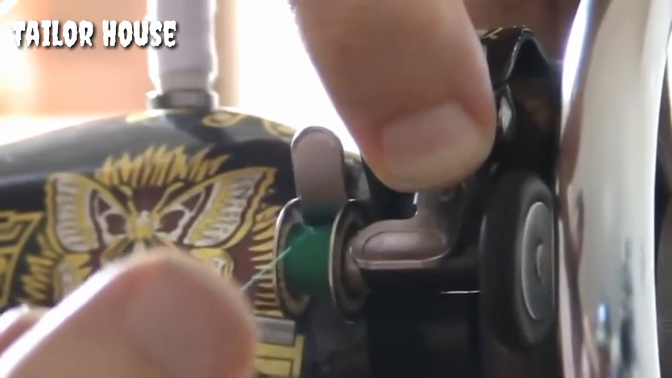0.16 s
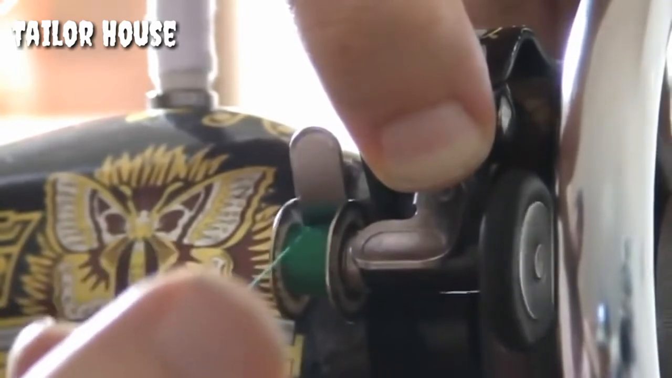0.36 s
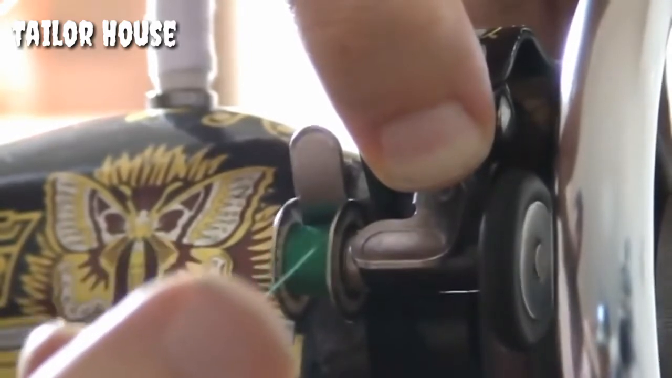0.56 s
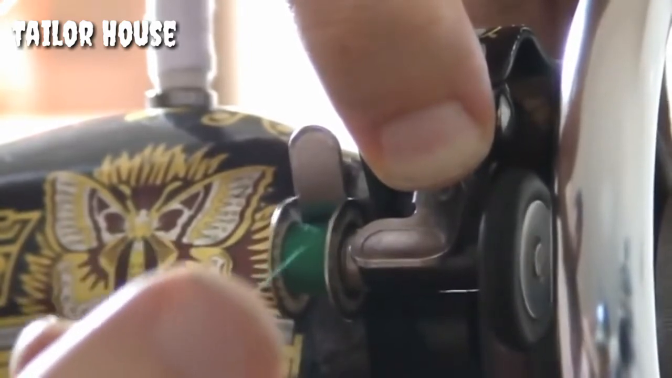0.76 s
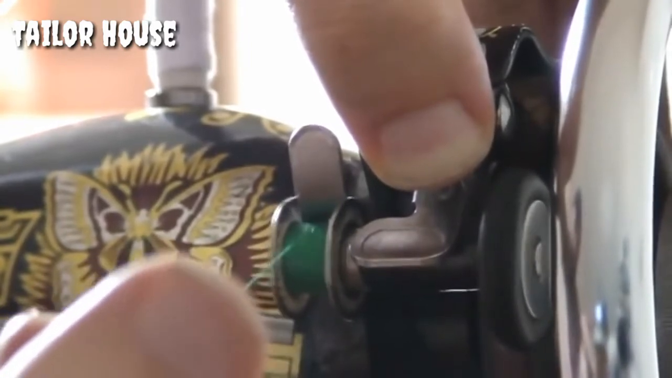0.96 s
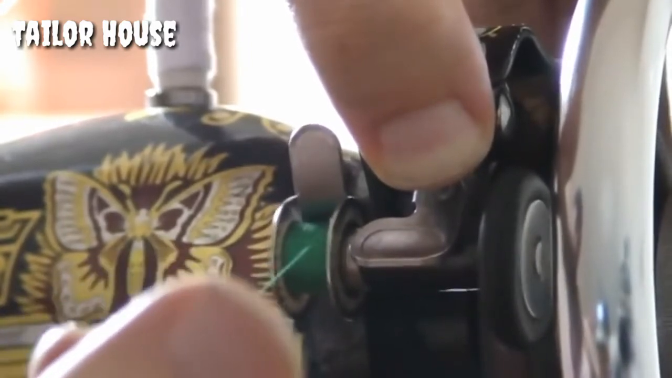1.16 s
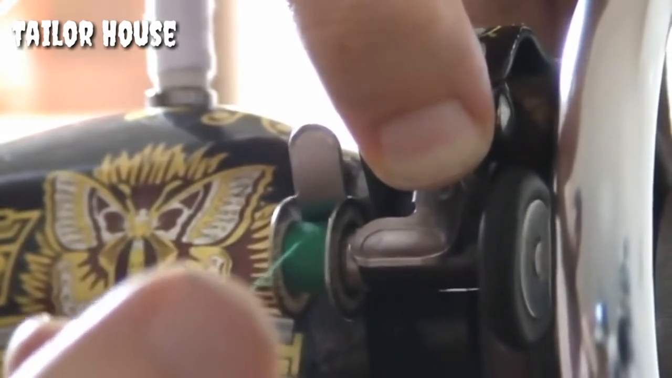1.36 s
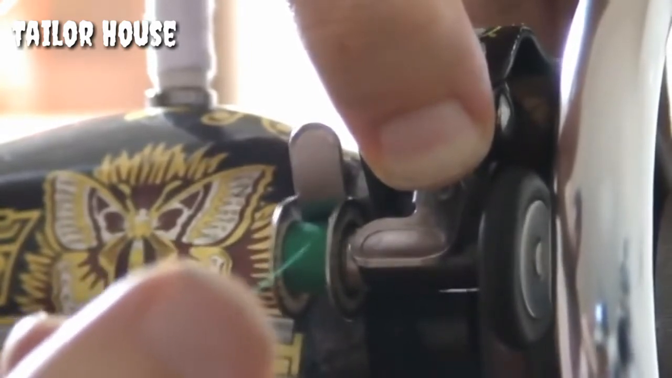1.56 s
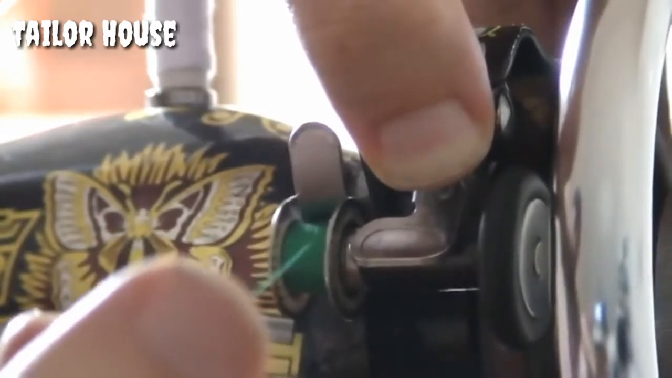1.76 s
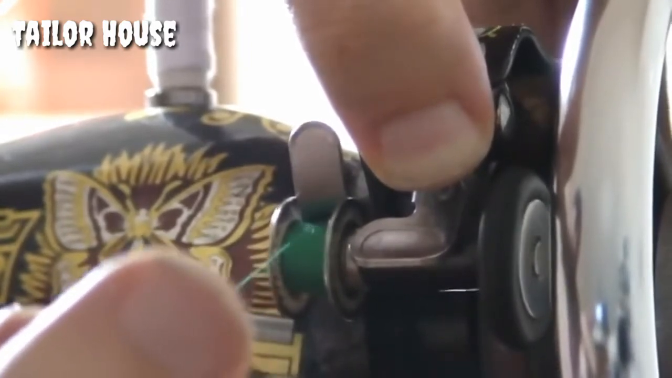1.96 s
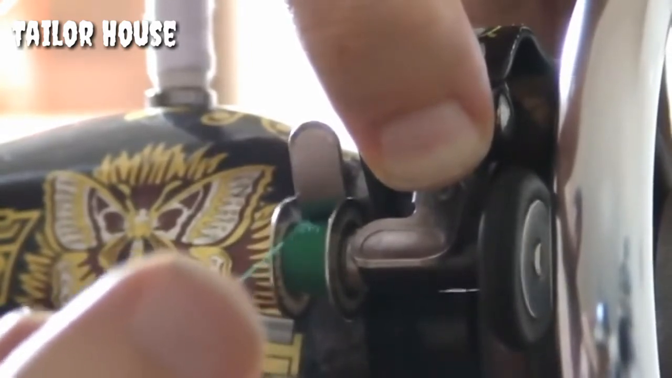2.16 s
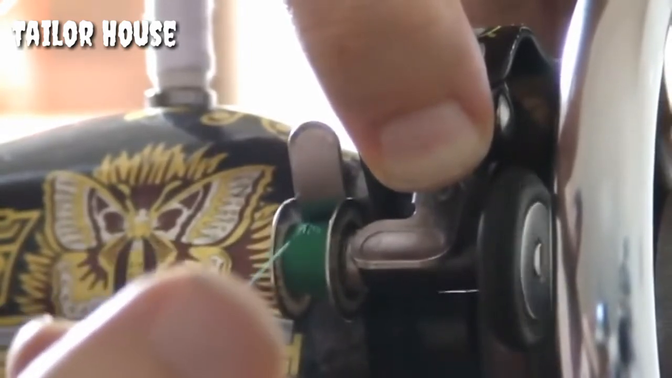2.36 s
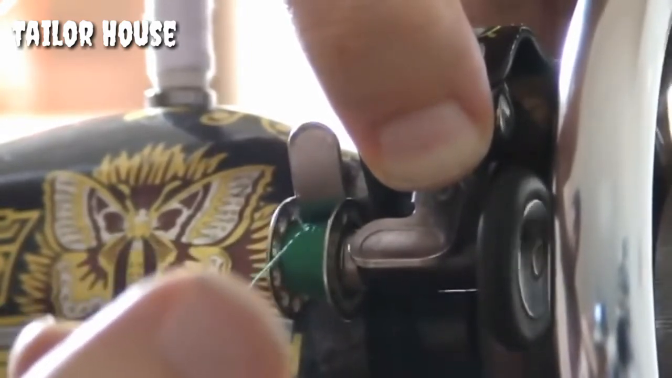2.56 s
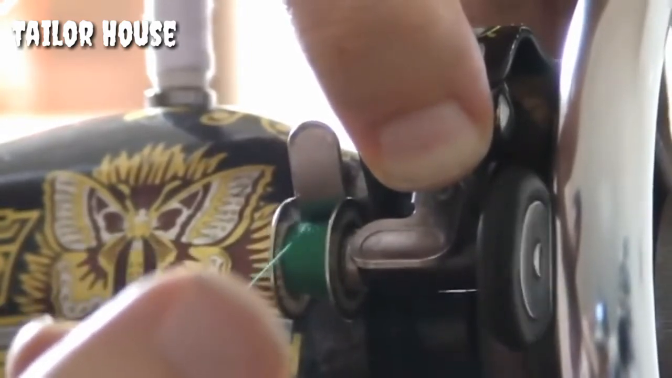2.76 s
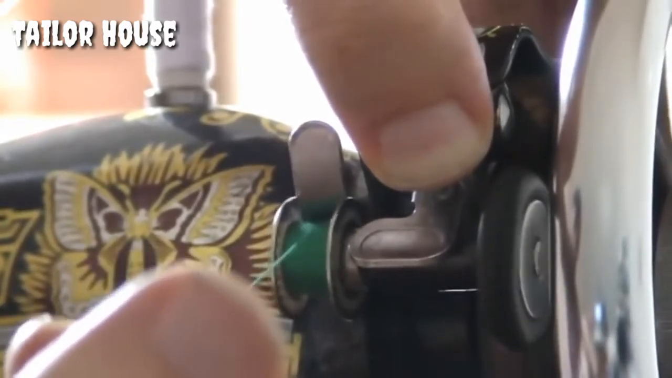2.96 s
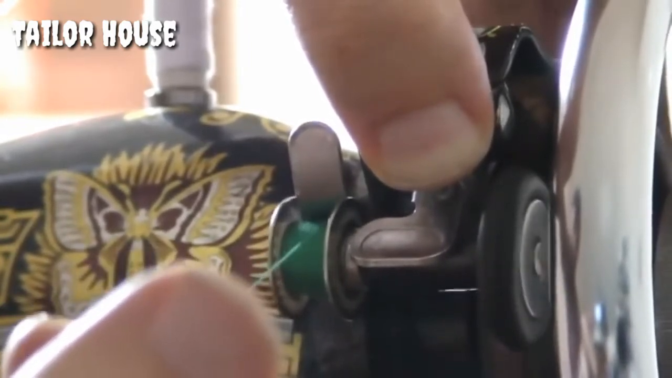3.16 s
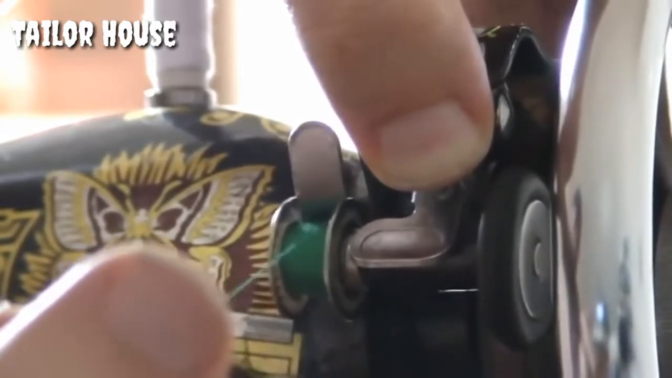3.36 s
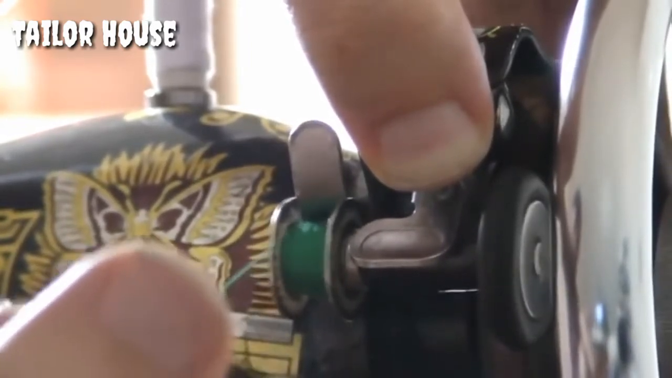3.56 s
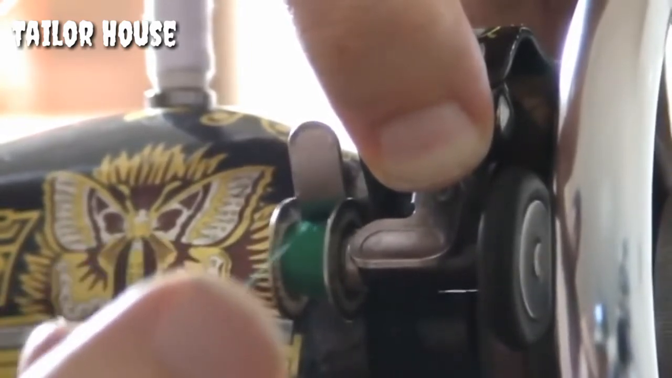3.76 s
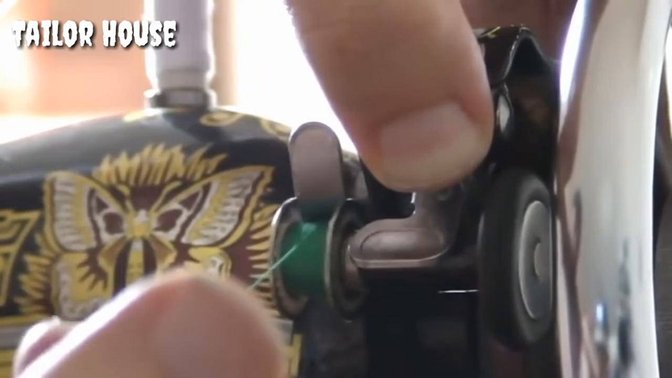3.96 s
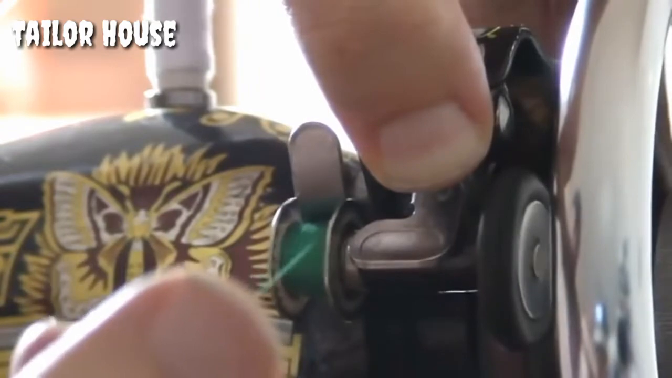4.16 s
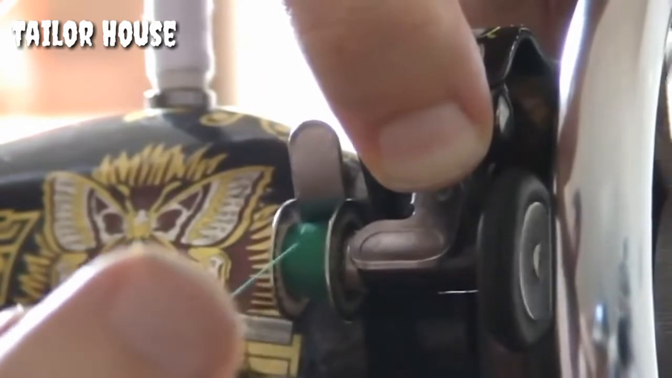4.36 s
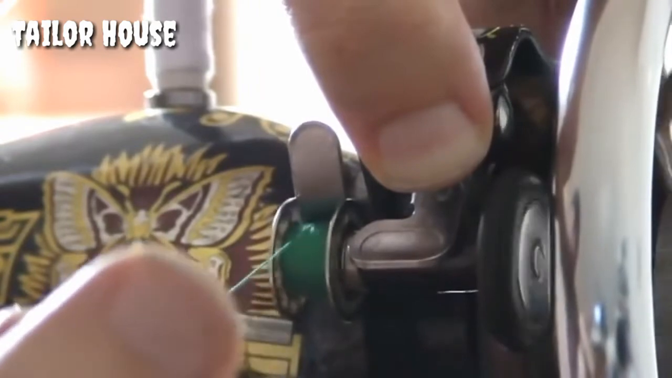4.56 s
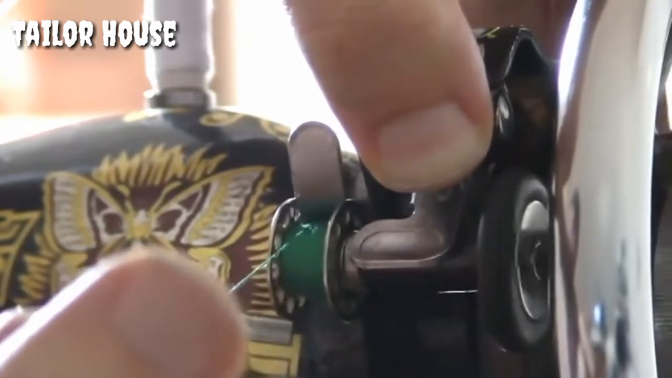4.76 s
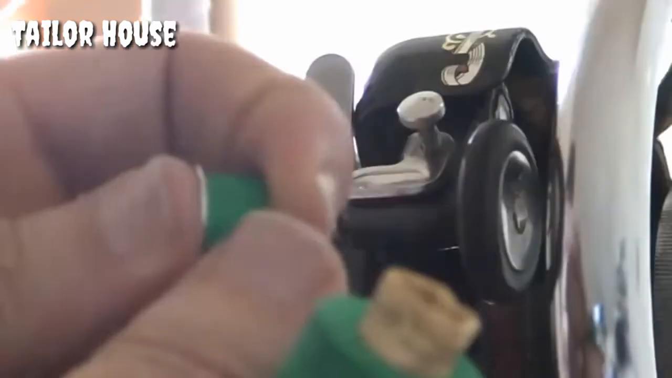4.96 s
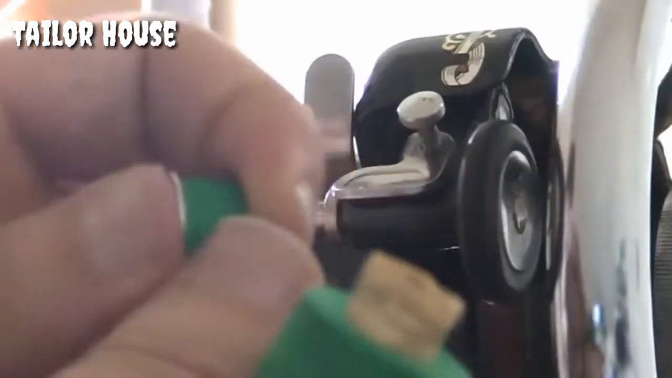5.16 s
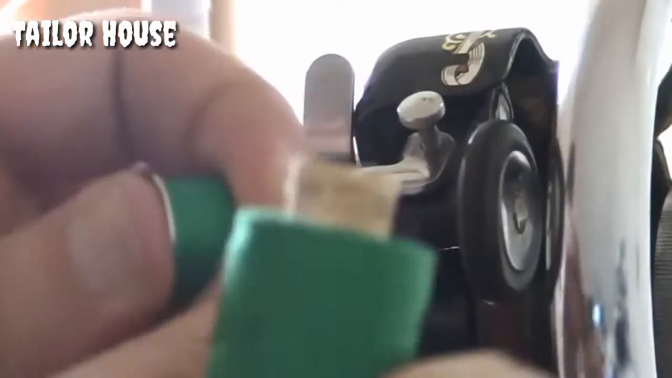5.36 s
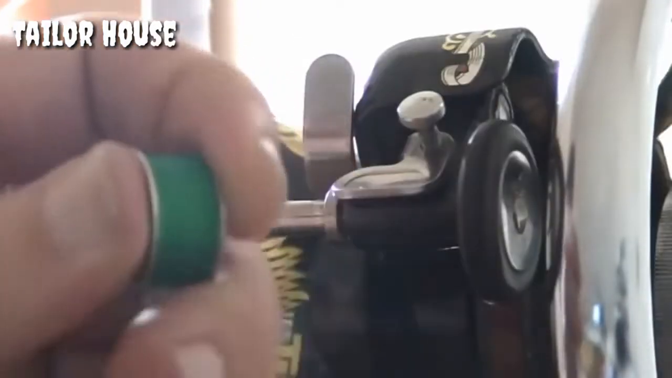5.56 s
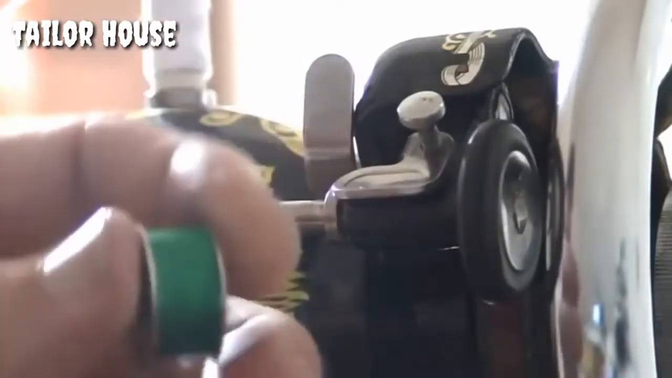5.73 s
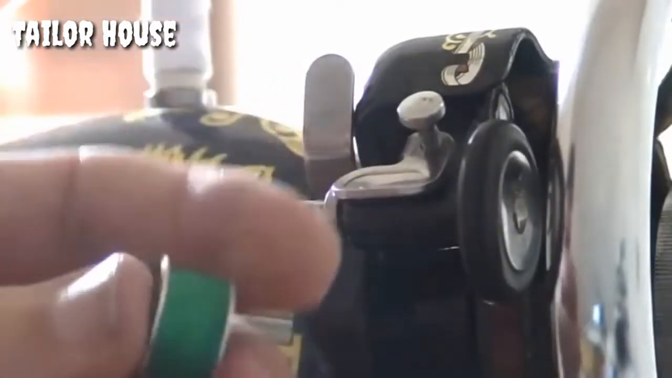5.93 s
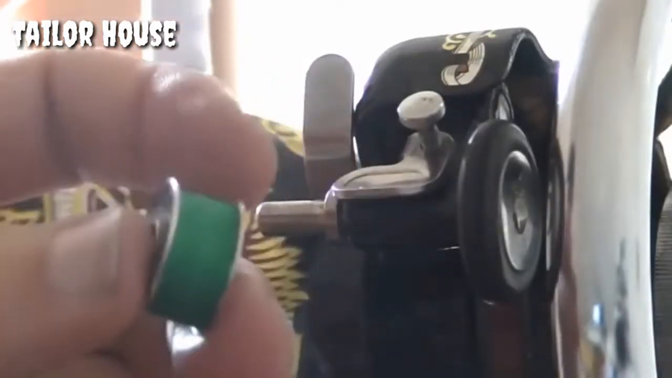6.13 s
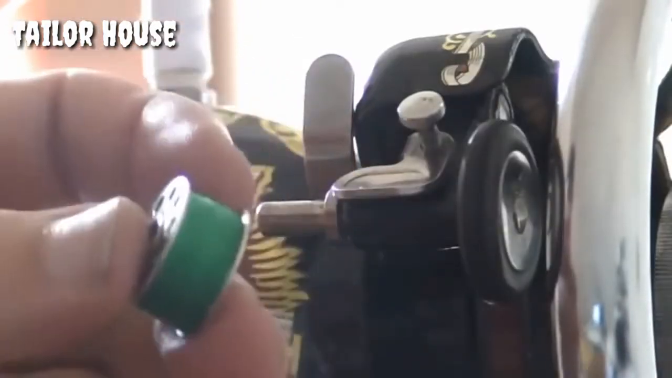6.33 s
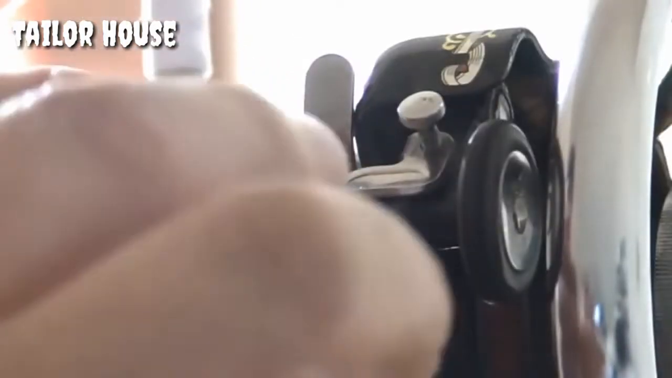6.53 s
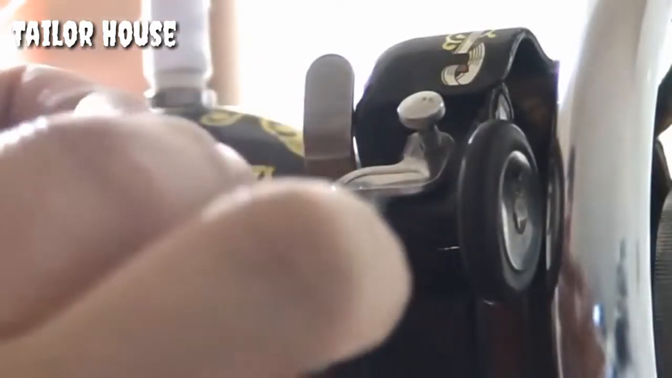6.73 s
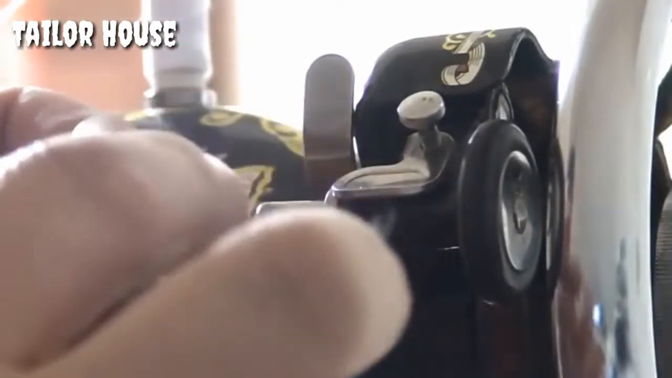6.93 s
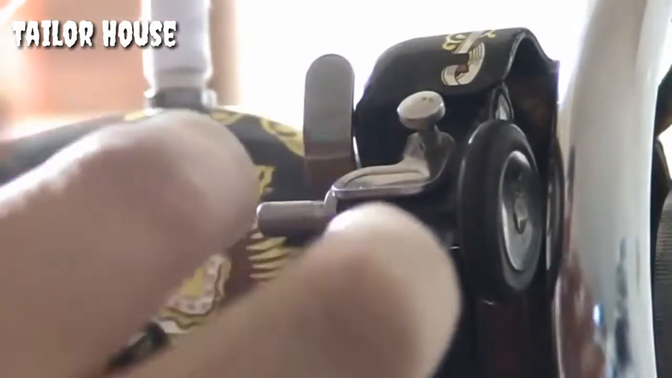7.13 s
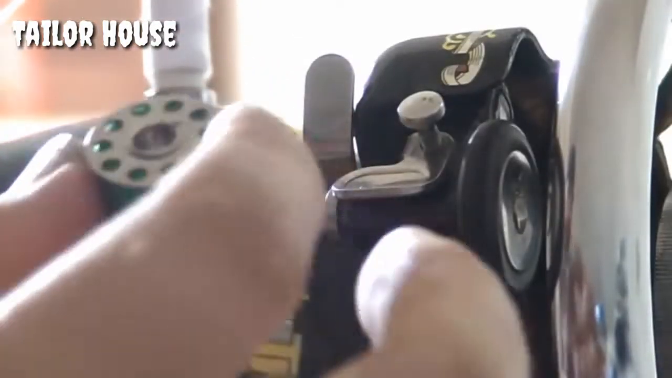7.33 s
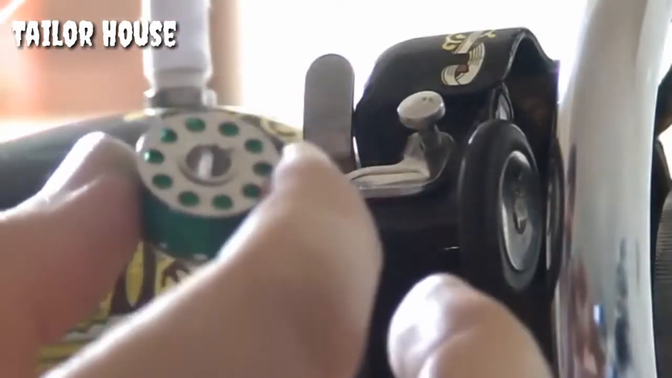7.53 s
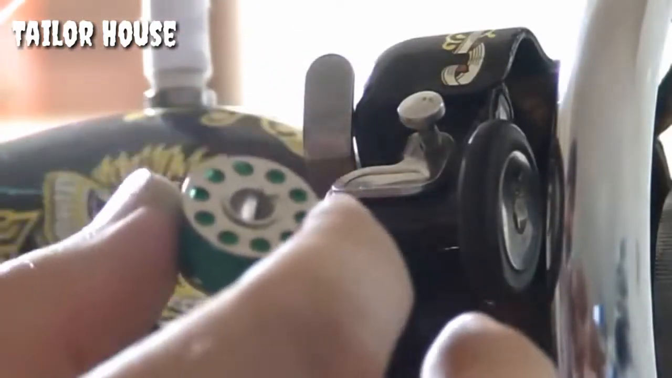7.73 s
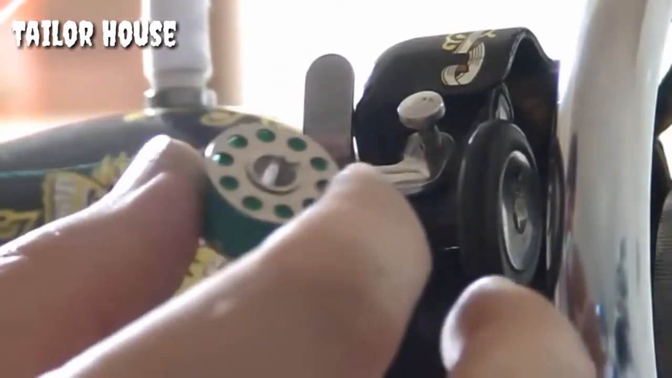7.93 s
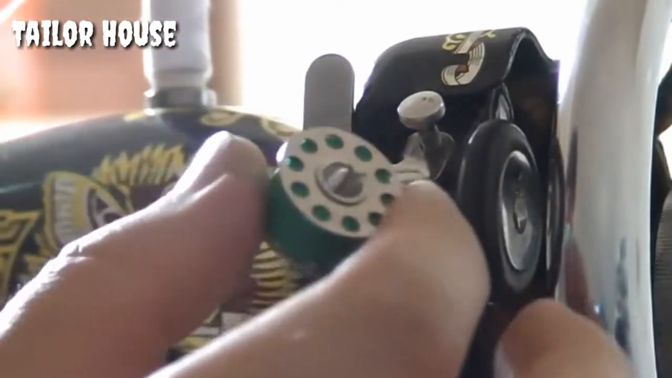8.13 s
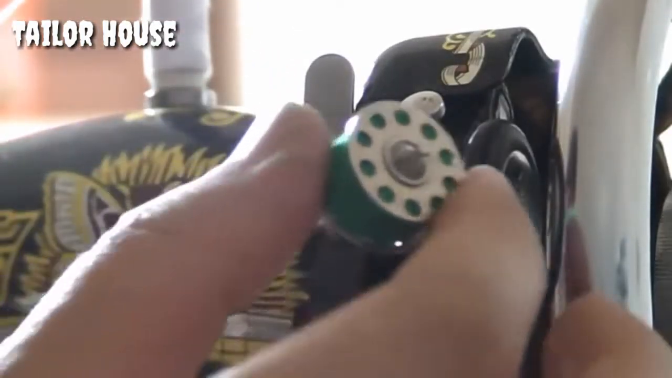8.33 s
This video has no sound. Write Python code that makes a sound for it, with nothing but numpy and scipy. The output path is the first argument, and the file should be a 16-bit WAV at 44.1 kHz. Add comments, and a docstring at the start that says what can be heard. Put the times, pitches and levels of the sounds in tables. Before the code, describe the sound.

Close up, a sewing machine's bobbin winder is already running, a dry bright metallic rattle over motor hum and a spindle whine. It slackens until about 0.5 s, then a knock and short scrape mark the drive gripping again; the rattle thickens and the whine climbs, fastest near 1.7 s. It coasts down into separate knocks and nearly stops around 2.6 s. Another scrape at 2.7 s, and it speeds up to a peak near 3.75 s, then slows and dies by 4.75 s. A ringing latch click comes at 4.9 s, another at 4.95 s, cut by a tiny dip. A quiet room follows: hiss, wavering low hum, faint purr. A sharp thread snap cracks at 5.3 s, with weaker ticks at 5.1 and 5.5 s. Dull thuds land around 6.1 to 6.3 s. Soft finger rustle passes between 7.2 and 7.9 s, then quiet to the end.

```python
"""Bobbin winder on a sewing machine

A motor spins a bobbin winder in spells, close to two microphones. Filtered noise makes the rattle and knocks,
and sines locked to the turning spindle make the whine; both are coloured by resonances of the cast body.
The winder coasts to a stop, a latch clicks with ringing sines, and the level dips for a moment. Then short
noise bursts make thread snaps and dull thuds, and slower noise a finger rustle, in a room with hiss,
a wavering 100 Hz hum, thin high tones and a faint purr."""
import sys
import numpy as np
from scipy import signal
from scipy.fft import irfft
from scipy.io import wavfile
from scipy.ndimage import uniform_filter1d

SR = 44100
rng = np.random.default_rng(int(sys.argv[2]) if len(sys.argv) > 2 else 0)


def store_wav(level_fs):
    """Save 16-bit WAV to argv[1]."""
    pcm = np.round(np.clip(np.atleast_2d(level_fs), -1, 1) * 32767)
    wavfile.write(sys.argv[1], SR, pcm.T.astype(np.int16))


N = 369991
T = np.arange(N) / SR
HZ = np.fft.rfftfreq(16384, 1 / SR)

# Levels in the tables are relative unless called rms or peak.
# Loudness of the rattle as the winder runs: (time [s], level [dB])
RUN = [(0.0, -18), (0.43, -23), (0.61, -21.5), (0.93, -16.5), (1.62, -17), (1.91, -18.5), (2.2, -20.5),
       (2.4, -24.5), (2.49, -27), (2.55, -41.5), (2.64, -44), (2.69, -30), (2.82, -26), (2.91, -22.5),
       (3.11, -18.5), (3.3, -17), (3.8, -18), (4.16, -21.5), (4.43, -25), (4.52, -29.5), (4.6, -30.5),
       (4.69, -50.5), (4.84, -74)]
# Speed of the spindle as the motor pulls and the winder coasts: (time [s], speed [turns/s])
SPIN = [(0.0, 20.7), (0.5, 13.2), (0.9, 25.0), (1.14, 30.3), (1.22, 31.3), (1.36, 31.8), (1.45, 32.7),
        (1.56, 31.8), (1.7, 34.9), (1.82, 31.8), (1.9, 28.9), (2.2, 20.2), (2.56, 8.2), (2.7, 9.3),
        (3.1, 21.3), (3.51, 31.1), (3.75, 35.6), (3.83, 34.2), (4.01, 26.7), (4.4, 19.1), (4.84, 5.1)]
# Clearest knocks of loose parts: (time [s], level [dB])
KNOCKS = [(0.173, 0), (0.2344, -7), (0.2932, -6.5), (0.397, -8), (0.4673, -4.5), (0.5013, -12),
          (0.566, 1.5), (0.633, -5), (0.7019, -3), (0.793, -6), (0.8445, -4), (0.9763, -2), (1.0355, -2),
          (1.8911, -4), (1.954, -6), (2.1306, -4), (2.2513, 0), (2.3193, -6), (2.4099, -13), (2.4319, -9),
          (2.4603, -7.5), (2.474, -10), (2.5636, -9), (2.5919, -11.5), (2.6454, -11), (2.6636, -3),
          (2.7248, -8), (2.7467, -16), (2.7634, -6.5), (2.826, -7.5), (2.9148, -3.5), (2.946, -3),
          (2.983, -5), (3.017, -3.5), (3.043, -1.5), (3.0954, -3), (3.9548, 0.5), (4.459, -9),
          (4.472, -12.5), (4.5185, -9.5), (4.5411, -9), (4.554, -9.5), (4.571, -10), (4.587, -17),
          (4.639, -17), (4.7007, -18.5)]
# The bobbin rubs harder or lifts off, so the rattle surges or lulls: (centre [s], change [dB])
SURGES = [(0.09, 3), (0.175, -1), (0.38, -2), (0.401, 3.5), (0.455, -5), (0.705, 1), (0.744, 2.5),
          (0.806, 3.5), (0.849, 2), (0.922, -0.5), (0.981, 0.5), (1.174, 1.5), (1.401, 0.5), (1.482, 1.5),
          (1.598, 2), (1.709, 2.5), (1.759, 1), (1.932, 1.5), (1.976, 2), (2.016, 4.5), (2.136, 2),
          (2.199, 2), (2.253, 1), (2.309, -2), (2.368, 6), (2.4, -6.5), (2.749, 7.5), (2.812, -6),
          (2.84, 3.5), (2.879, 4), (2.949, 0.5), (3.049, -2), (3.105, 0.5), (3.289, 2), (3.435, 2),
          (3.532, 0), (3.742, 1.5), (3.828, 2), (3.88, 3), (3.957, -2), (4.027, 4), (4.065, 5.5),
          (4.108, 7), (4.154, 4), (4.2, 4), (4.251, 5), (4.314, 4), (4.384, 8), (4.465, 3), (4.505, -4.5),
          (4.574, 5)]
# Colour of the rattle: (frequency [Hz], level per Hz [dB])
RATTLE = [(1180, -43), (2000, -5), (2320, -5.5), (3680, -4.5), (4190, -4), (6640, -3.5), (8050, -7),
          (10800, -5.5), (14900, -16.5), (16000, -14)]
# Resonances of the cast body, spindle and bobbin: (frequency [Hz], width [Hz], height above the spectrum [dB])
BODY = [(107, 12, 9.5), (178, 10, 2.5), (291.3, 9.6, 5.5), (313, 9, 4.5), (677, 20, 11), (784, 35, 8.5),
        (808.6, 22, 12), (993, 37, 12), (1450, 38, 8), (1561, 41, 12.5), (1371, 30, 4), (1717, 50, 10.5),
        (1804, 40, 10), (2320, 52, 9.5), (2787, 116, 5.5), (3256, 37, 5.5), (4300, 130, 4.5),
        (5730, 89, 3.5), (6770, 120, 4.5), (8600, 250, 3.), (10600, 85, 11.5), (11340, 140, 5),
        (11430, 140, 6), (13000, 230, 3.5)]
# Resonances of the steel bobbin: (frequency [Hz], width [Hz], level [dB])
BOBBIN = [(10960, 280, 6), (11600, 500, -7), (12700, 900, -11)]
# Balance of the machine in the two microphones: (frequency [Hz], left minus right [dB])
NEAR_LR = [(60, -7.5), (210, -14.), (330, -10.), (500, -4.), (800, -8.), (1800, -8.), (2800, -4.),
           (6400, -1.5), (8500, 0.), (10500, 1.1), (11600, 0.1), (12000, -17.), (15000, -24.)]
# Likeness of the machine in the two microphones: (frequency [Hz], likeness [0-1])
NEAR_SAME = [(60, 0.1), (300, 0.25), (1400, 0.55), (3000, 0.061), (5000, 0.15), (7000, 0.11), (10500, 0.37),
             (15000, 0.29)]
# Strength of each whine tone at 30 turns a second, ahead of the body: (level [dB])
WHINE_DB = [-52, -50, -45, -41, -38, -47, -52, -47, -54, -49]
WHINE_ORDERS = np.arange(6, 16)  # multiples of the spindle speed
# Whole multiples of the spindle speed that kick the arm: (multiple [1], level [dB])
ARM_KICKS = [(8, -28.), (9, -21.), (10, -22.), (11, -33.), (14, -18.)]
# Spells in which the motor takes current: (start [s], end [s], 50 Hz hum at its top [dB])
PULLS = [(-.3, .12, -47), (.5, 1.7, -46), (2.674, 3.78, -43)]
# Room hum near 100 Hz: (time [s], level [dB])
HUM = [(4.98, -64), (5.25, -52), (6.19, -43.5), (6.26, -29.5), (6.35, -66), (6.39, -46), (7.53, -45.5),
       (7.55, -51.5), (8.13, -50), (8.26, -40), (8.34, -61), (8.39, -45)]
# Colour of the room hiss: (frequency [Hz], level per Hz [dB])
ROOM = [(76, -21.5), (130, -7), (191, -5), (228, -11), (303, -2.5), (370, -7.5), (846, -8), (1120, -8.5),
        (1220, -11), (2270, -15.5), (3010, -17), (6210, -19), (16000, -26)]
# Balance of the room in the two microphones: (frequency [Hz], left minus right [dB])
ROOM_LR = [(60, -23), (130, -18), (290, -1.5), (640, 3.5), (1410, 3), (3100, 1), (6820, -0.5),
           (15000, -12.5)]
# Likeness of the room in the two microphones: (frequency [Hz], likeness [0-1])
ROOM_SAME = [(60, 0.73), (400, 0.49), (2000, 0.28), (15000, 0.1)]
# Thin steady tones: (frequency [Hz], level [dB rms])
THIN_TONES = [(6000, -81.), (12000, -77.), (12048, -81.), (13000, -84.)]
# Short scrapes as the drive wheel grips: (time [s], frequency [Hz], peak [dB], time to fall 60 dB [s])
CHIRPS = [(0.568, 2740, -18.5, 0.21), (2.664, 2290, -21, 0.31), (2.664, 1020, -26, .06),
          (2.731, 2730, -23.5, 0.27), (4.682, 796, -38.5, 0.28), (4.72, 1600, -49, 0.16)]
# Latch clicks: (time [s], peak [dB], ring relative to the crack [dB], brightness [dB per octave])
LATCH = [(4.863, -35, 0, 2), (4.879, -36, 2, 2), (4.889, -10, -4.5, 2.5), (4.949, -12.5, -21, 3)]
# Ringing of the latch metal: (frequency [Hz], level [dB], time to fall 60 dB [s])
LATCH_MODES = [(1030, 3, 0.036), (2360, -5, 0.035), (2520, 2, 0.039), (2850, 1, 0.045), (4770, -2.5, 0.012),
               (5950, -3, .015), (10700, -15, .03)]
# Colour of the latch crack: (frequency [Hz], level per Hz [dB])
LATCH_CRACK = [(290, -55), (500, -4), (988, -2.5), (2010, -9), (2540, -5), (3490, -9), (4940, 0),
               (12000, -10), (16000, -14)]
# The level dips between these times: (start [s], end [s])
GAP = (4.954, 4.978)
# Spells of the purr: (start [s], end [s], level [dB])
PURR = [(4.98, 6.14, -60.), (7.8, 8.5, -60)]
# Thread snaps:
# (time [s], peak [dB], left minus right [dB], brightness [dB per octave], decay [s], tail share [1])
SNAPS = [(5.125, -27.5, -5., 7.5, 0.0029, 0.15), (5.3087, -5.5, -2.5, -1.5, 0.0019, 0.059),
         (5.511, -24, 0, 7, 0.0023, 0.15)]
# Colour of a snap: (frequency [Hz], level per Hz [dB])
SNAP = [(88, -51), (150, -25), (923, -24), (1560, -7), (2060, -16), (2870, 0), (3550, -5.5), (4160, -3.5),
        (5250, -13.5), (7320, -15), (10800, -16), (15100, -25), (16000, -31)]
# Dull thuds: (time [s], peak [dB], brightness [dB per octave])
THUDS = [(6.1258, -24, -4), (6.2293, -10, 2.5), (6.257, -21, 1)]
# Colour of a thud: (frequency [Hz], level per Hz [dB])
THUD = [(35, -41), (60, -24), (117, 4.5), (225, -9), (301, 2), (641, -8), (975, 0), (1080, -15),
        (1420, -11.5), (2210, -32), (3580, -38), (5920, -60), (9000, -53), (11700, -80), (19800, -120)]
# How long a thud rings: (frequency [Hz], time to fall 60 dB [s])
THUD_T60 = [(100, 0.16), (260, 0.27), (700, 0.16), (1840, 0.18), (4850, 0.13)]
# Finger rustle: (time [s], level [dB])
RUSTLE = [(7.0, -70), (7.32, -53), (7.62, -49.5), (7.71, -53), (7.78, -49.5), (7.87, -59), (8.0, -68)]
# Colour of the rustle: (frequency [Hz], level per Hz [dB])
RUSTLE_COLOUR = [(800, -8), (2000, 0), (4500, 0), (7000, -3), (12000, -4), (16000, -12)]

# "FOLLOWS" is the share of the rattle's dB swings that a layer copies
FULL_DB = -16  # rattle level at full speed
RUMBLE_DB, RUMBLE_FOLLOWS = -33.5, 0.47  # below 600 Hz
RING_DB, RING_FOLLOWS = -28, 0.8  # 600-2000 Hz
TREBLE_DB, TREBLE_FOLLOWS, TREBLE_HZ = -20., 1.28, 9600.  # the top swings wider than the rest
SURGE_S = 0.0073  # width of a surge: standard deviation of its bell curve
SURGE_SONG_DB, KNOCK_SONG_DB = -14, -13  # the bobbin's song relative to the rattle and to each knock
ARM_HZ, ARM_WIDTH_HZ = 284., 9.  # lowest resonance of the cast arm
ARM_SHAKE_DB, ARM_FOLLOWS = -35, 0.41
HUM_HZ, HUM_WAVER_DB = 100., 2
MOTOR_HUM_HZ, IDLE_HUM_DB = 49.5, -68.
TABLE_HZ, TABLE_WIDTH_HZ, TABLE_DB, TABLE_FOLLOWS = 103.2, 9.3, -37.5, .35
PULL_RISE_S, PULL_SINK_DB_PER_S, RELEASE_S = .05, 14., .12
BUZZ_DB, BUZZ_RISE_S, BUZZ_SINK_DB_PER_S = 15.5, 0.21, 16.5  # 100 Hz buzz, level over the motor hum
PULL_RUMBLE_DB = 9.5  # the rumble swells with the buzz
ROOM_DB, EARLY_ROOM_DB = -50.5, -3  # hiss, and how much it is changed until the dip ends
PURR_PER_S = 25.  # taps a second
EDGE_HZ = 15490  # upper limit of the sound


def gain_of(db):
    """Turns decibels into a multiplier."""
    return 10 ** (np.asarray(db) / 20)


def evened(x):
    """Scales a sound to rms 1."""
    return x / np.sqrt(np.mean(x ** 2) + 1e-20)


def read(points, hz):
    """Reads a table between its points, along a log-frequency axis."""
    f, value = np.transpose(points)
    return np.interp(np.log(hz + 1), np.log(f + 1), value)


def curve(rows):
    """Joins (time, value) points into a curve over the whole scene."""
    s, value = np.transpose(rows)
    return np.interp(T, s, value)


def slow(rate_hz):
    """Random wandering of rms 1: noise with everything faster than the rate filtered away."""
    return evened(signal.lfilter(*signal.butter(2, rate_hz, fs=SR), rng.standard_normal(N)))


def causal(db):
    """Minimum-phase filter: has the wanted gain at each frequency and starts as promptly as it can."""
    log_gain = np.log(gain_of(np.maximum(db, -100)))
    full = np.concatenate([log_gain, log_gain[-2:0:-1]])
    return np.fft.ifft(np.exp(np.conj(signal.hilbert(full)))).real[:len(db)]


def even_filter(x, gain):
    """Applies a gain per frequency without shifting the sound in time."""
    kernel = np.roll(irfft(gain), 1024)[:2049] * np.hanning(2049)
    return signal.oaconvolve(x, kernel, "same")


def pair(drive, db, balance, same):
    """Colours a drive for two microphones; the left hears a part shared with the right and a part of its own."""
    like = np.clip(read(same, HZ), -.99, .99)
    half = gain_of(read(balance, HZ) / 2)
    shared, own = signal.oaconvolve(drive, causal(db)[None], axes=1)[:, :N]
    left = even_filter(shared, half * like) + even_filter(own, half * np.sqrt(1 - like ** 2))
    right = even_filter(shared, 1 / half)
    return np.array([left, right])


def ringing(x, hz, width_hz):
    """One resonance, with gain 1 at its centre."""
    return signal.lfilter(*signal.iirpeak(hz, hz / width_hz, SR), x)


def follow(full_db, share):
    """Level of a layer that follows a share of the rattle's swings and fades fast at the stop."""
    stop_db = -300 * np.clip(T - RUN[-1][0] + 0.037, 0, 1)
    return full_db + share * (curve(RUN) - FULL_DB) + stop_db


def current(rise_s, sink_db_per_s):
    """Motor's pull: up at each start, sinking as the winder gains speed, off when the pedal lifts."""
    total = 0
    for s, end, db in PULLS:
        gate = np.clip(np.minimum((T - s) / rise_s, (end - T) / RELEASE_S + 1), 0, 1)
        total = total + gate * gain_of(db - sink_db_per_s * abs(T - s))
    return total


def buzz_pull():
    """The slower building and fading pull behind the buzz and the rumble."""
    return current(BUZZ_RISE_S, BUZZ_SINK_DB_PER_S)


def spindle_turns():
    """Turns made so far: the speed added up over time."""
    return np.cumsum(curve(SPIN)) / SR


def body_lift():
    """Resonances of the body as a boost in dB at each frequency."""
    power = sum((gain_of(2 * db) - 1) / (1 + (2 * (HZ - f) / w) ** 2) for f, w, db in BODY)
    return 10 * np.log10(1 + power)


def surges():
    """Brief bell-shaped swells and lulls, in dB."""
    return sum(db * np.exp(-.5 * ((T - s) / SURGE_S) ** 2) for s, db in SURGES)


def contact_burst():
    """Loudness of one contact: a fast rise, a quick fall and a weak longer tail."""
    t = T[:2000]
    return (1 - np.exp(-t / 0.00037)) * (np.exp(-t / 0.0048) + 0.14 * np.exp(-t / 0.04))


def knocking():
    """Loudness of the clear knocks: one contact burst at each listed time."""
    train = np.zeros(N)
    for s, db in KNOCKS:
        train[round(s * SR)] = gain_of(db)
    # noise peaks stand 11.5 dB above its rms
    return signal.oaconvolve(train, contact_burst())[:N] * gain_of(-11.5)


def chattering(surge_db):
    """Small chance knocks over a steady rub, with a throb once a turn from the off-centre bobbin."""
    sizes = gain_of(1.55 * np.minimum(rng.exponential(1, N), 4))
    small = sizes * (rng.random(N) < 150 / SR)  # about 150 a second
    throb_db = 0.99 * np.cos(2 * np.pi * spindle_turns()) * (1 + .5 * slow(1.2))
    contacts = evened(1 + 0.057 * signal.oaconvolve(small, contact_burst())[:N])
    return contacts * gain_of(throb_db + surge_db + 0.25 * slow(12.2))


def low_cut(hz):
    """Fades what lies below a frequency, in dB."""
    return -20 * np.log10(1 + (hz / (HZ + 1)) ** 4)


def rattle(surge_db, knocks):
    """Contacts and knocks shake the body: noise in four bands, each with its own loudness."""
    split = (HZ + 1) / TREBLE_HZ
    main_colour = read(RATTLE, HZ) + 1.5 * low_cut(2000) - 10 * np.log10(1 + split ** 16)
    treble_colour = read(RATTLE, HZ) - 10 * np.log10(1 + split ** -16)
    ring_colour = low_cut(600) - 20 * np.log10(1 + (HZ / 1900) ** 6)
    rumble_colour = low_cut(95) - 20 * np.log10(1 + (HZ / 600) ** 4)
    treble_db = follow(TREBLE_DB, TREBLE_FOLLOWS) + 0.42 * surge_db + .8 * slow(31.0)
    ring_db = follow(RING_DB, RING_FOLLOWS) + 0.95 * slow(15.0)
    strain = gain_of(PULL_RUMBLE_DB) * buzz_pull()
    rumble = np.hypot(gain_of(follow(RUMBLE_DB, RUMBLE_FOLLOWS)), strain)
    rumble_db = 20 * np.log10(rumble + 1e-9) + 1.74 * slow(9.6)
    # each band: running level [dB], knock level [dB], colour [dB]
    layers = [(curve(RUN) - 1.9, -2.5, main_colour), (treble_db, -3., treble_colour),
              (ring_db, -14., ring_colour), (rumble_db, -25., rumble_colour)]
    chatter = chattering(surge_db) * (T < RUN[-1][0])
    roughness = gain_of(1.0 * rng.standard_normal(N))  # shared by all bands
    lift_db = body_lift()
    out = 0
    for db, knock_db, colour_db in layers:
        colour_db = colour_db + lift_db
        colour_db = colour_db - 10 * np.log10(np.mean(gain_of(2 * colour_db)))  # same power for any colour
        shake = np.hypot(gain_of(db) * chatter, gain_of(knock_db) * knocks)
        grit = rng.standard_normal((2, N)) * roughness
        out = out + gain_of(0.5) * pair(grit * shake, colour_db, NEAR_LR, NEAR_SAME)
    return out


def bobbin_song(surge_db, knocks):
    """The steel bobbin sings when knocked or rubbed: noise through its resonances."""
    song = sum(gain_of(db) * evened(ringing(rng.standard_normal((2, N)), f, w)) for f, w, db in BOBBIN)
    song = (song[:1] + 0.17 * song) / song.std()  # mostly alike in both microphones
    rubbed = gain_of(curve(RUN) + SURGE_SONG_DB) * np.maximum(gain_of(surge_db) - 1, 0)
    excitation = gain_of(KNOCK_SONG_DB) * knocks + rubbed
    return song * signal.lfilter([.004], [1, -.996], excitation)  # the song lingers a few ms


def patchy(x, depth_db):
    """Loose parts take turns: random patches of some hundred Hz and some tens of ms swell and sink."""
    z = signal.stft(x, nperseg=512, noverlap=384)[2]
    patches = uniform_filter1d(rng.standard_normal(z.shape[1:]), size=8, axis=0)
    patches = uniform_filter1d(patches, size=10, axis=1)
    return signal.istft(z * gain_of(depth_db * evened(patches)), nperseg=512, noverlap=384)[1][:, :N]


def spindle_whine(force):
    """Tones at whole multiples of the spindle speed, coloured by the body."""
    turns = spindle_turns()
    tones = sum(gain_of(db) * np.sin(2 * np.pi * k * (turns + k / 7)) for k, db in zip(WHINE_ORDERS, WHINE_DB))
    whine = force * tones
    return pair(np.array([whine, whine]), body_lift(), NEAR_LR, NEAR_SAME)


def cast_arm(force):
    """The arm rings when a multiple of the spindle speed meets its resonance, and the rattle shakes it too."""
    turns = spindle_turns()
    tones = sum(gain_of(db) * np.cos(2 * np.pi * k * turns) for k, db in ARM_KICKS)
    kicks = gain_of(-0.2 + 1.2 * slow(6.0)) * force * tones
    kicked = ringing(ringing(kicks, ARM_HZ, ARM_WIDTH_HZ), ARM_HZ, 33.0)
    shaken = evened(ringing(rng.standard_normal(N), ARM_HZ, ARM_WIDTH_HZ))
    shaken = shaken * gain_of(follow(ARM_SHAKE_DB, ARM_FOLLOWS))
    return (kicked + shaken) * gain_of([[-6.5], [3.5]])


def winder():
    """The running winder: rattle, singing bobbin, whine and ringing arm, all driven by the same motion."""
    surge_db, knocks = surges(), knocking()
    force = (curve(SPIN) / 30) ** 2.9 * gain_of(0.33 * slow(3.7))  # grows steeply with speed
    loose = patchy(rattle(surge_db, knocks) + bobbin_song(surge_db, knocks), 1.29)
    return loose + spindle_whine(force) + cast_arm(force)


def wavering_tone(hz, wander_hz, rate_hz):
    """A sine of rms 1 whose pitch wanders."""
    return np.sqrt(2) * np.sin(2 * np.pi * np.cumsum(hz + wander_hz * slow(rate_hz)) / SR)


def motor_hum():
    """A wavering tone near 50 Hz that grows with the motor's pull."""
    pull = gain_of(IDLE_HUM_DB) * (T < GAP[1]) + current(PULL_RISE_S, PULL_SINK_DB_PER_S)
    low = wavering_tone(MOTOR_HUM_HZ, 1.5, 5.57) * pull * gain_of(2.0 * slow(8.0))
    return low * np.array([[-1.5], [3.5]])  # plain multipliers: opposed in the two microphones


def room_hum_and_table():
    """A wavering 100 Hz room hum, and the table's drone near it under the running, buzzing machine."""
    hum = wavering_tone(HUM_HZ, 1.3, 9.1) * gain_of(curve(HUM) + HUM_WAVER_DB * slow(4.9))
    drone = ringing(ringing(rng.standard_normal(N), TABLE_HZ, TABLE_WIDTH_HZ), TABLE_HZ, 30.)
    buzz = gain_of(BUZZ_DB) * buzz_pull()
    table = evened(drone) * np.hypot(gain_of(follow(TABLE_DB, TABLE_FOLLOWS)), buzz)
    return (hum + table) * gain_of([[-4.5], [3.]])


def room_hiss():
    """Coloured noise that wavers slightly, quieter until the dip ends."""
    noise = rng.standard_normal((2, N)) * gain_of(0.81 * slow(8.0))
    hiss = evened(pair(noise, read(ROOM, HZ), ROOM_LR, ROOM_SAME))
    return gain_of(ROOM_DB + EARLY_ROOM_DB * (T < GAP[1])) * hiss


def thin_tones():
    """Steady high sines."""
    return sum(np.sqrt(2) * gain_of(db) * np.sin(2 * np.pi * f * T) for f, db in THIN_TONES)


def struck(s, db, sound, pan_db):
    """Places a two-channel sound at its time, peak level and left-right balance."""
    sound = sound / abs(sound.mean(0)).max() * gain_of(db + np.array([[pan_db / 2], [-pan_db / 2]]))
    return np.pad(sound, ((0, 0), (round(s * SR), N)))[:, :N]


def puff(colour, tilt_db, shape, same):
    """A noise burst, partly shared by both microphones, coloured and tilted per octave around 1 kHz."""
    a, b = rng.standard_normal((2, len(shape))) * shape
    body = causal(read(colour, HZ) + tilt_db * np.log2((HZ + 50) / 1000))[None, :2048]
    burst = np.array([same * a + np.sqrt(1 - same ** 2) * b, a])
    return signal.oaconvolve(burst, body, axes=1)[:, :len(shape)]


def wheel_scrapes():
    """Rubbing as the drive wheel grips: noise in a narrow band that dies away."""
    out, t = np.zeros((2, N)), T[:9000]
    for s, f, db, t60 in CHIRPS:
        fade = gain_of(-60 * t / t60) * (1 - np.exp(-t / 0.0013))
        scrape = signal.lfilter(*signal.iirpeak(f, 14., SR), rng.standard_normal((2, len(t))))
        out += struck(s, db, fade * (scrape[:1] + .5 * scrape), -15.0)
    return out


def latch_clicks():
    """Each click is a noise crack that sets the latch metal ringing."""
    out, t = np.zeros((2, N)), T[:9000]
    modes = sum(gain_of(db - 60 * t / t60) * np.sin(2 * np.pi * f * t) for f, db, t60 in LATCH_MODES)
    shape = (1 - np.exp(-t / 0.001)) * (np.exp(-t / 0.0028) + 0.14 * np.exp(-t / 0.062))
    for s, db, ring_db, tilt_db in LATCH:
        crack = evened(puff(LATCH_CRACK, tilt_db, shape, 0.43))
        ring = signal.oaconvolve(crack, modes[None], axes=1)[:, :len(t)]
        out += struck(s, db, crack + gain_of(ring_db) * evened(ring), -6.0)
    return out * (T < GAP[0] + .005)  # the latch does not come back after the dip


def purr():
    """A faint purr near 1 kHz: 25 short taps a second through a resonance, heard in spells."""
    since = (PURR_PER_S * T + 0.6) % 1 / PURR_PER_S  # time since the last tap
    tap = since / .003 * np.exp(-since / 0.0024) * gain_of(1.4 * slow(11.0))
    taps = tap * (np.sin(2 * np.pi * 1070 * since) + 3.1 * rng.standard_normal((2, N)))
    band = signal.iirpeak(1080, 2.8, SR)
    sound = evened(signal.lfilter(*band, signal.lfilter(*band, taps)))
    spells = sum(gain_of(db) * np.clip(np.minimum(T - s, end - T) / 0.062, 0, 1) for s, end, db in PURR)
    return spells * sound


def thread_snaps():
    """A sharp noise crack with a short room tail."""
    out, t = np.zeros((2, N)), T[:9000]
    for s, db, pan_db, tilt_db, decay, share in SNAPS:
        tail = share * (1 - np.exp(-(t / 0.0029) ** 2)) * np.exp(-t / 0.032)  # the walls answer after a few ms
        crack = (1 - np.exp(-t / 0.00053)) * np.exp(-t / decay)
        echo = puff(SNAP, 0, tail, 0.37) * 0.58
        snap = puff(SNAP, tilt_db, crack + 0.52 * tail, 0.41)
        out += struck(s, db, echo + snap, pan_db)
    return out


def dull_thuds():
    """Low noise bursts in which each frequency dies away at its own pace."""
    out, t = np.zeros((2, N)), T[:9000]
    for s, db, tilt_db in THUDS:
        hz, at, z = signal.stft(puff(THUD, tilt_db, np.ones(len(t)), 0.39), SR, nperseg=256)
        t60 = np.maximum(read(THUD_T60, hz), .02)[:, None]
        body = signal.istft(z * gain_of(-60 * at / t60), SR, nperseg=256)[1]
        out += struck(s, db, body[:, :len(t)] * (1 - np.exp(-t / .0005)), -6.5)
    return out


def finger_rustle():
    """Fingers rub: soft noise with a quickly wavering level."""
    fade = np.clip(np.minimum(T - RUSTLE[0][0], RUSTLE[-1][0] - T) / .1, 0, 1)
    rub = rng.standard_normal((2, N)) * gain_of(curve(RUSTLE) + 1.4 * slow(40.)) * fade
    return pair(rub, read(RUSTLE_COLOUR, HZ), ROOM_LR, ROOM_SAME)


def scene():
    """Everything that reaches the microphones."""
    machine = winder() + motor_hum() + wheel_scrapes() + latch_clicks()
    room = room_hum_and_table() + room_hiss() + thin_tones() + purr()
    return machine + room + thread_snaps() + dull_thuds() + finger_rustle()


def record(dry):
    """A brief dip to a fifth of the level, clipping of the highest peaks, then the upper frequency limit."""
    falling, rising = (GAP[0] - T) / 0.0027 + 1, (T - GAP[1]) / 0.0009
    kept = np.clip(np.maximum(falling, rising), .2, 1)
    low_pass = signal.firwin(1501, EDGE_HZ, window=("kaiser", 8), fs=SR)
    return signal.oaconvolve(np.clip(dry * kept, -1, 1), low_pass[None], "same")


dry = scene()
out = record(dry)
store_wav(out)
```